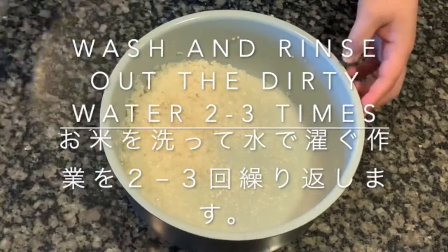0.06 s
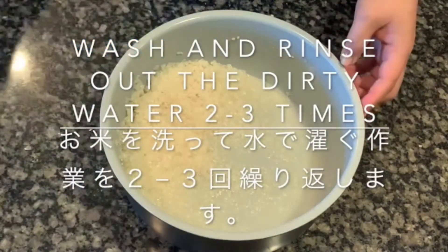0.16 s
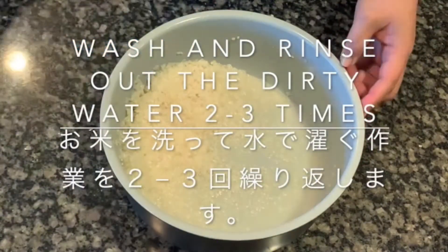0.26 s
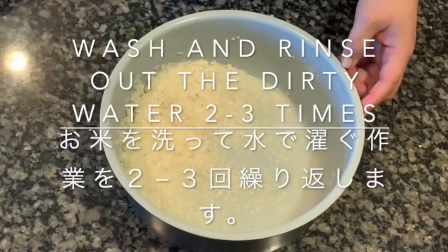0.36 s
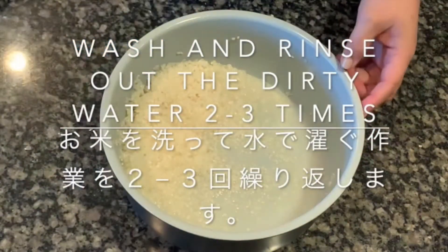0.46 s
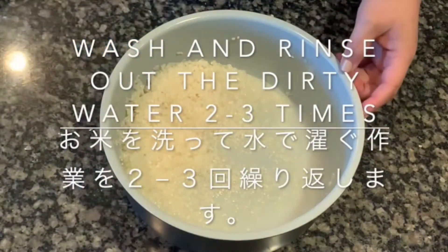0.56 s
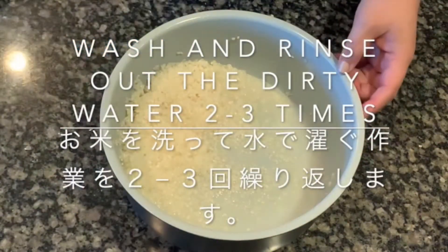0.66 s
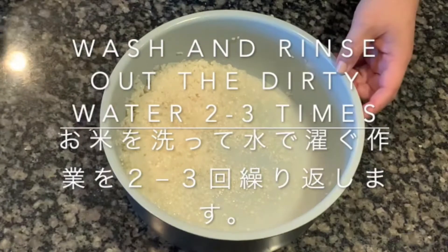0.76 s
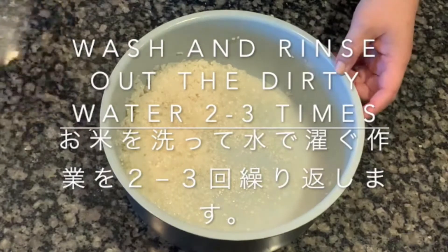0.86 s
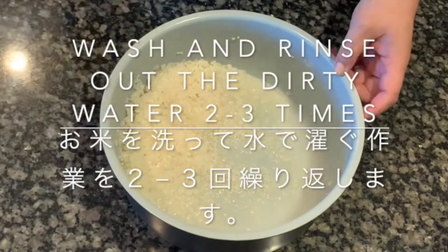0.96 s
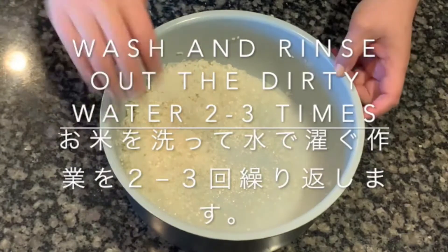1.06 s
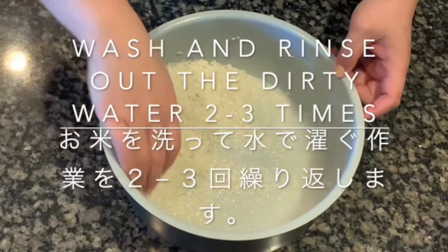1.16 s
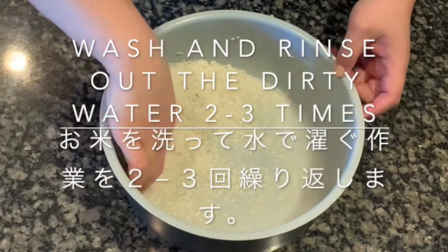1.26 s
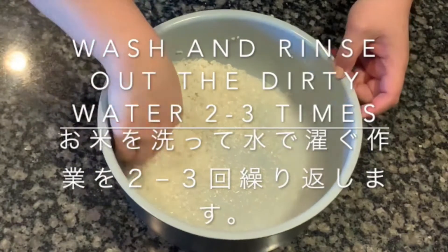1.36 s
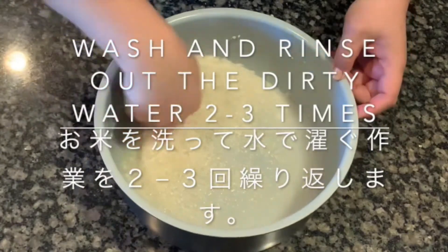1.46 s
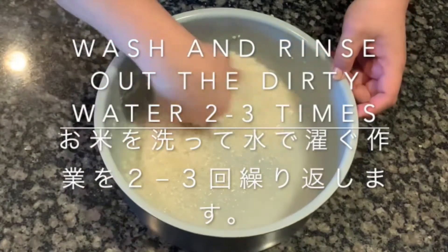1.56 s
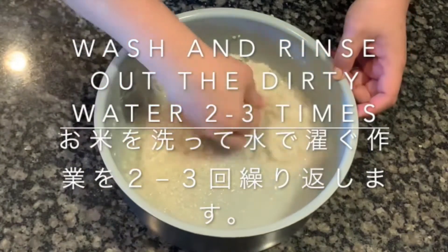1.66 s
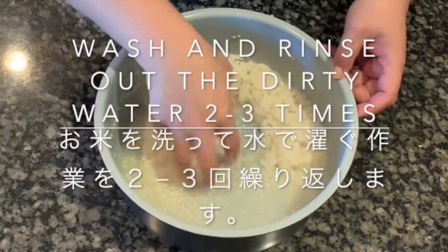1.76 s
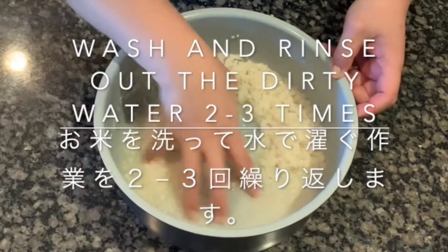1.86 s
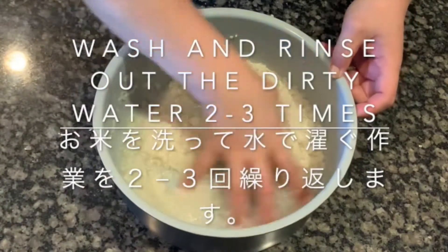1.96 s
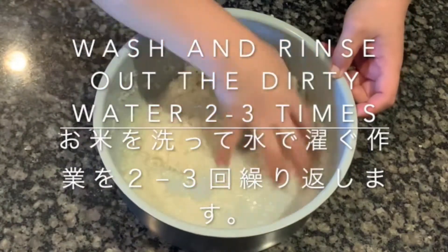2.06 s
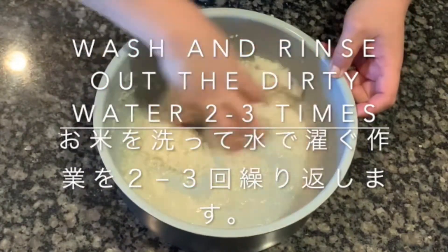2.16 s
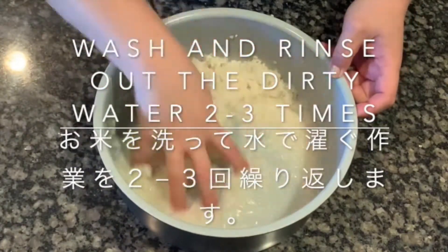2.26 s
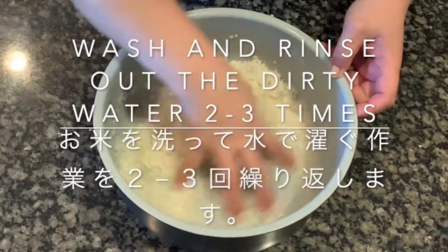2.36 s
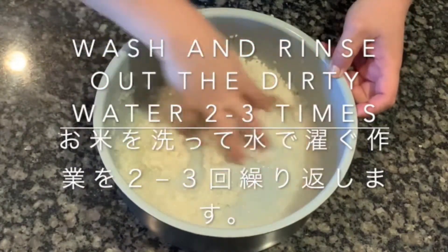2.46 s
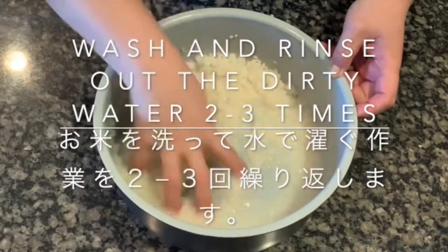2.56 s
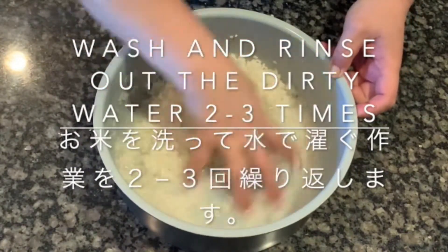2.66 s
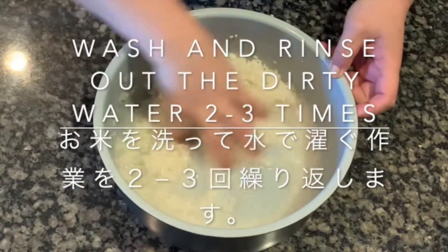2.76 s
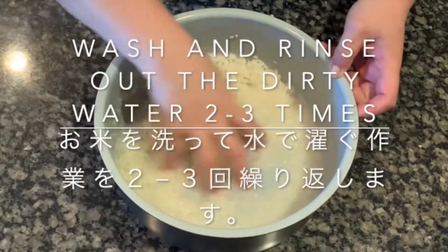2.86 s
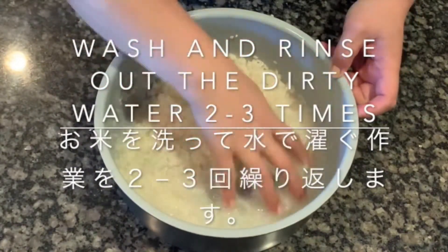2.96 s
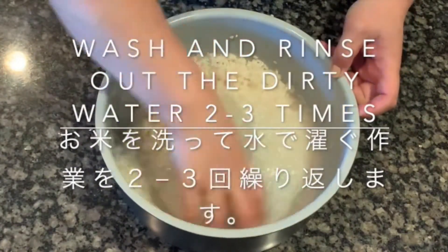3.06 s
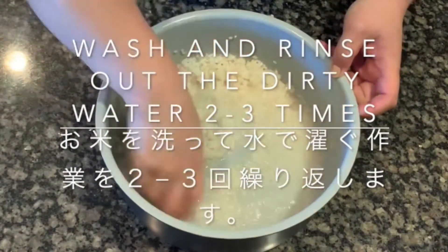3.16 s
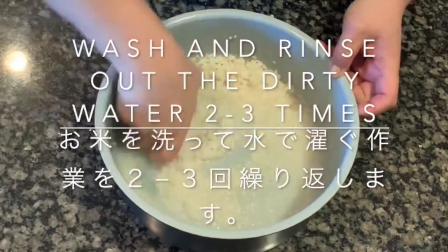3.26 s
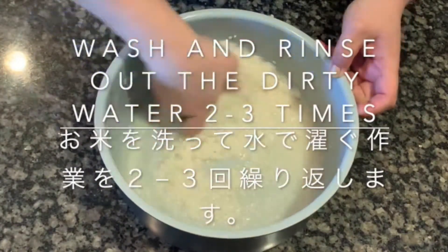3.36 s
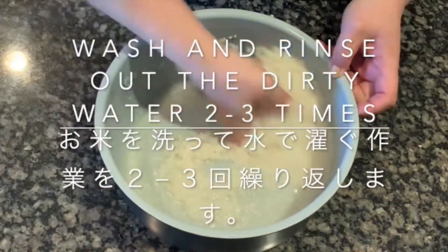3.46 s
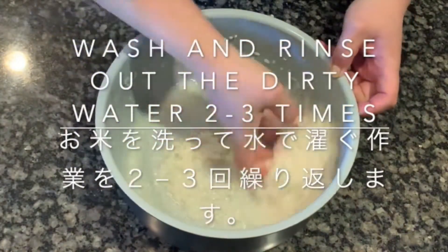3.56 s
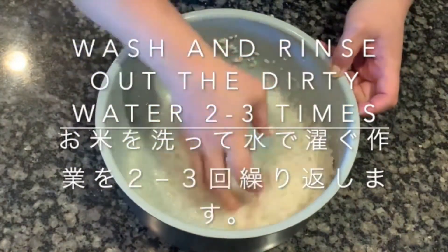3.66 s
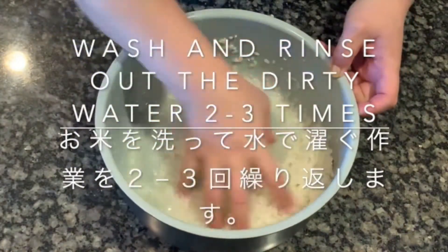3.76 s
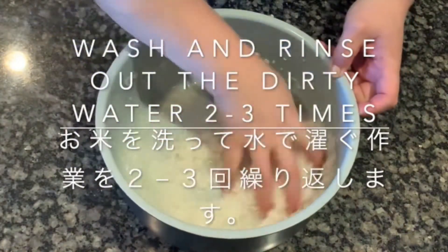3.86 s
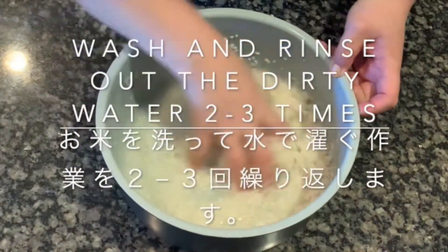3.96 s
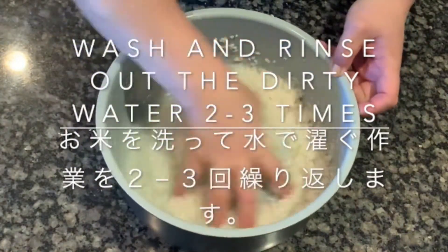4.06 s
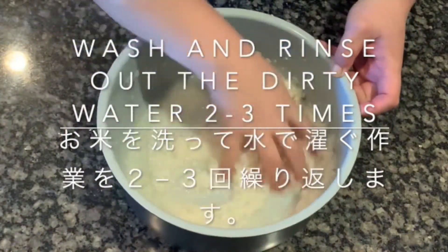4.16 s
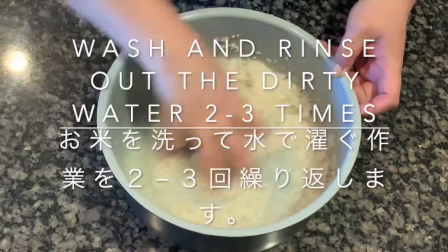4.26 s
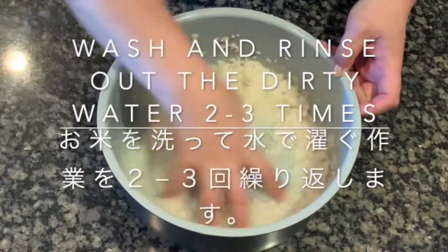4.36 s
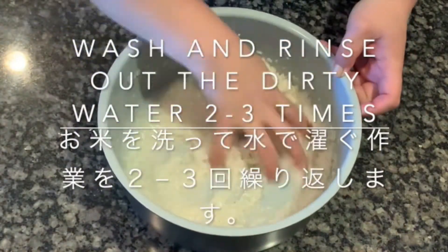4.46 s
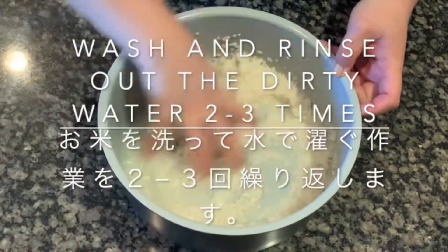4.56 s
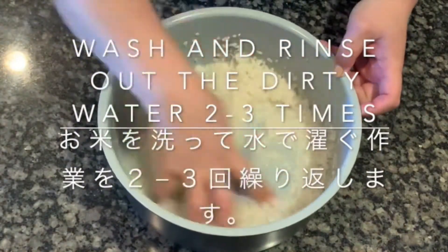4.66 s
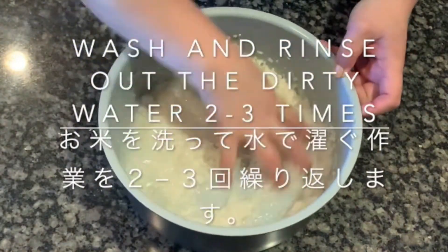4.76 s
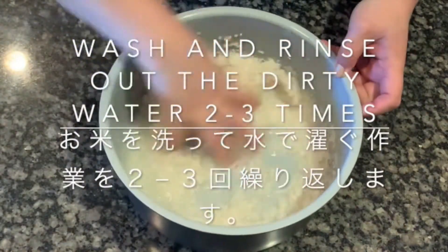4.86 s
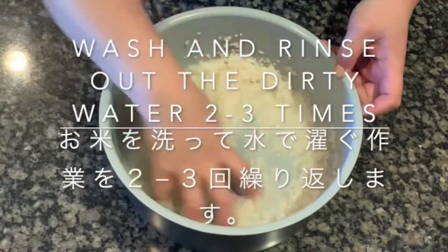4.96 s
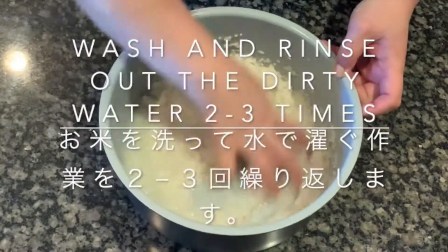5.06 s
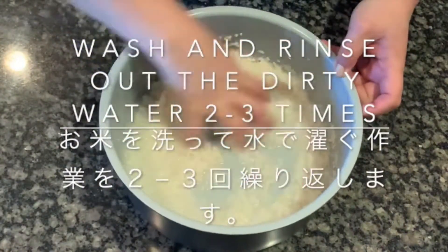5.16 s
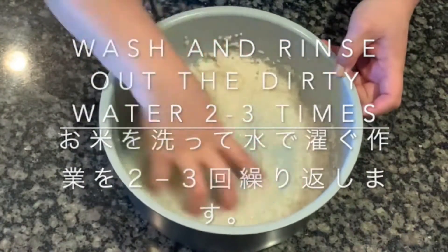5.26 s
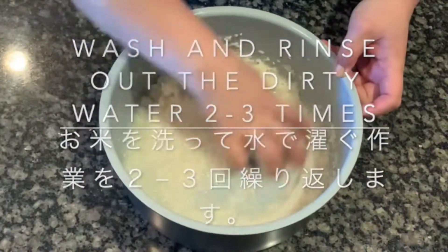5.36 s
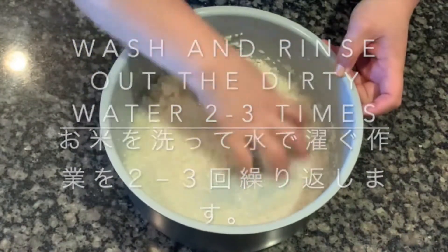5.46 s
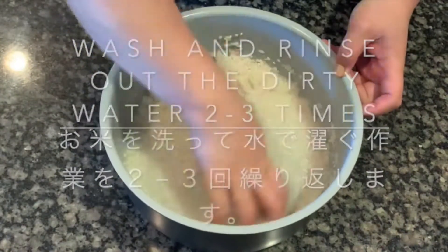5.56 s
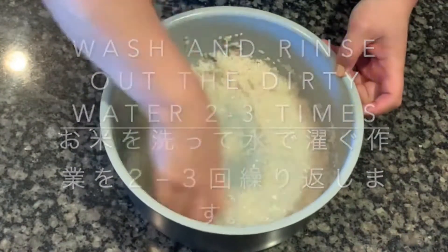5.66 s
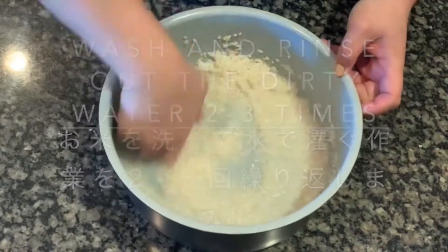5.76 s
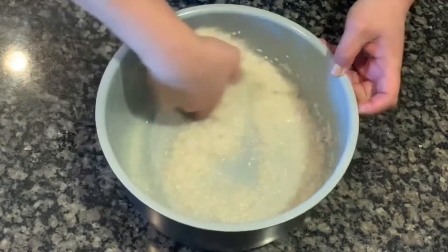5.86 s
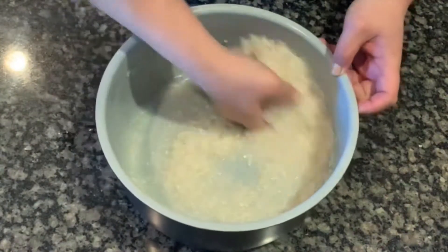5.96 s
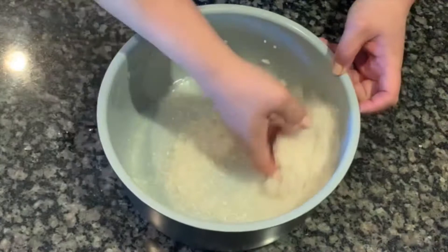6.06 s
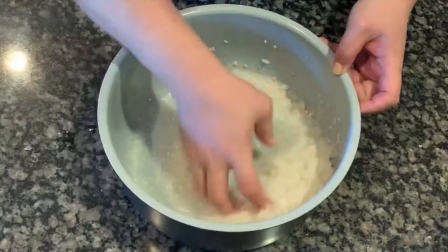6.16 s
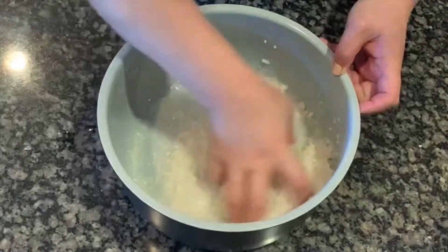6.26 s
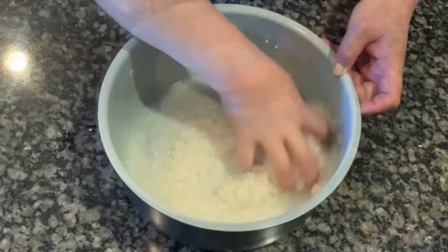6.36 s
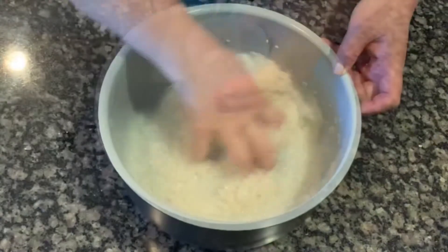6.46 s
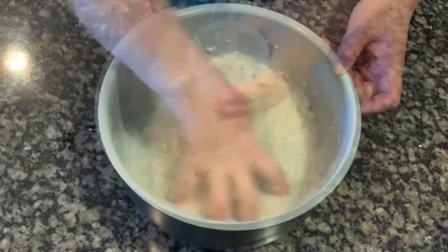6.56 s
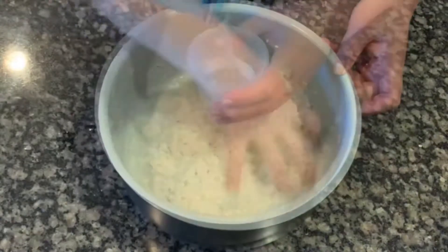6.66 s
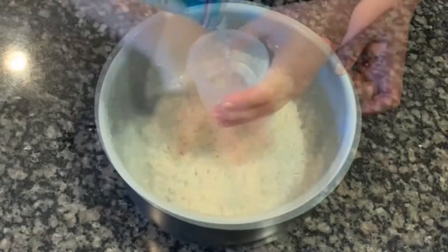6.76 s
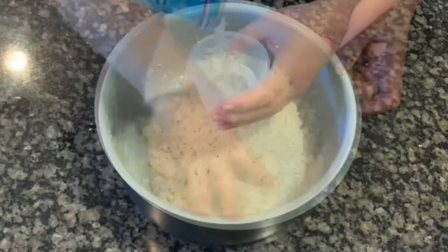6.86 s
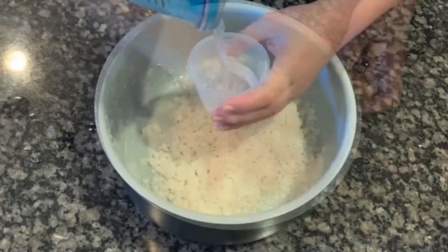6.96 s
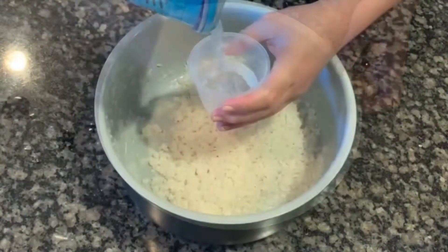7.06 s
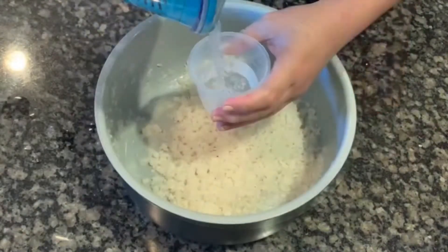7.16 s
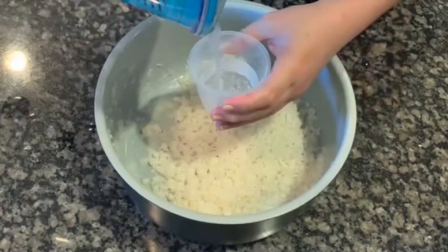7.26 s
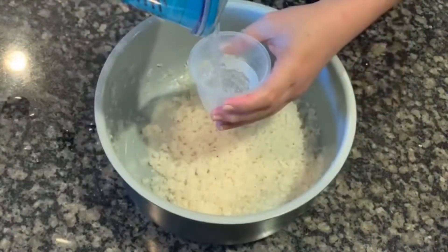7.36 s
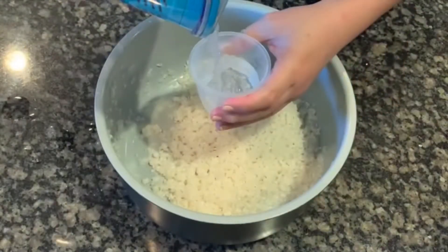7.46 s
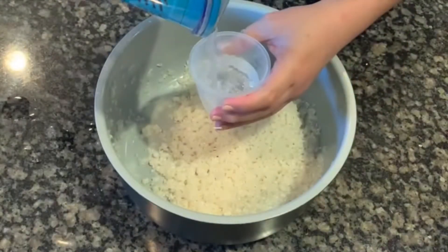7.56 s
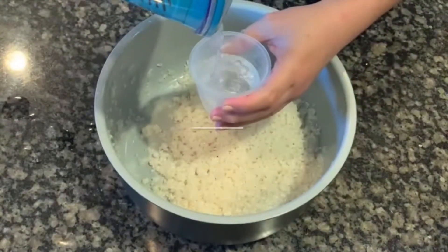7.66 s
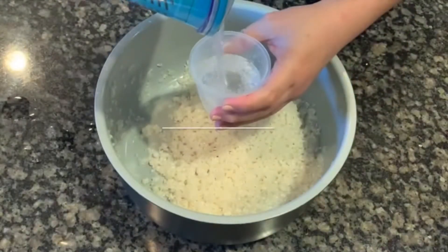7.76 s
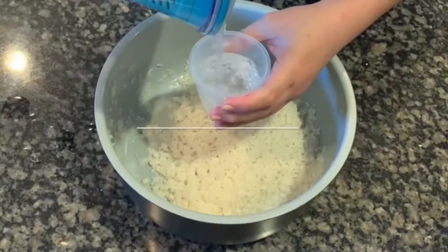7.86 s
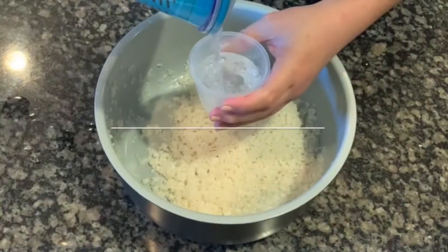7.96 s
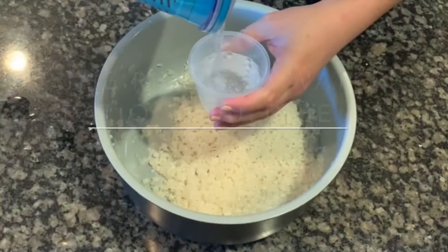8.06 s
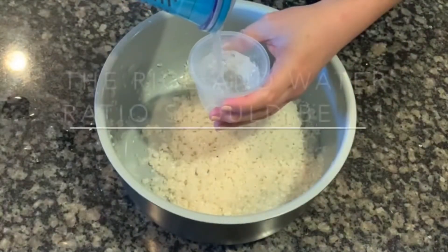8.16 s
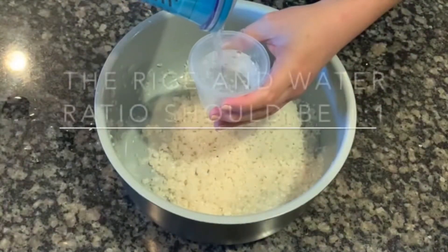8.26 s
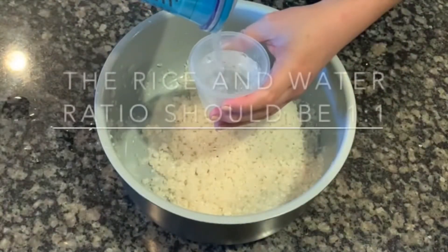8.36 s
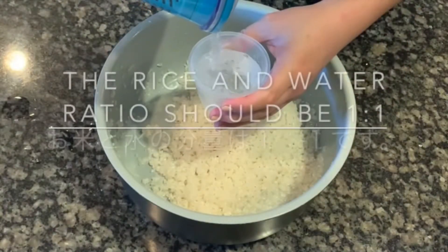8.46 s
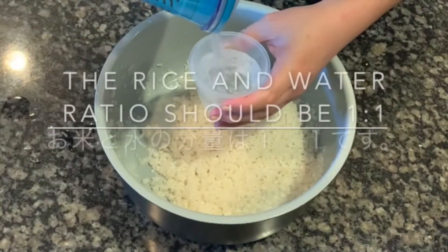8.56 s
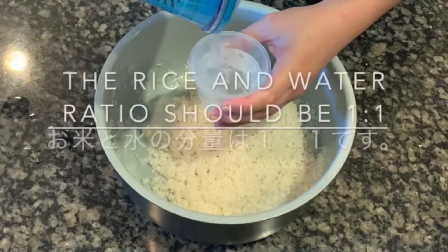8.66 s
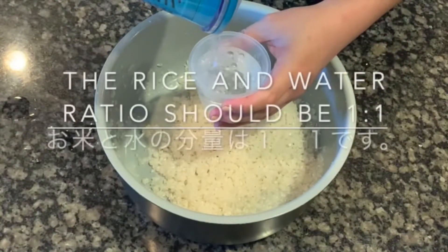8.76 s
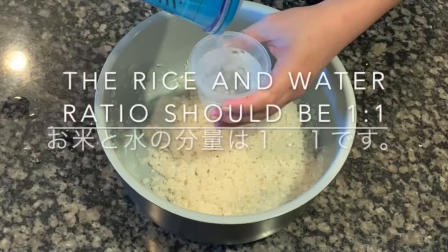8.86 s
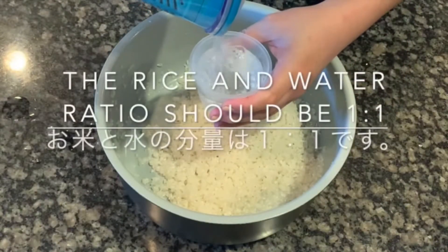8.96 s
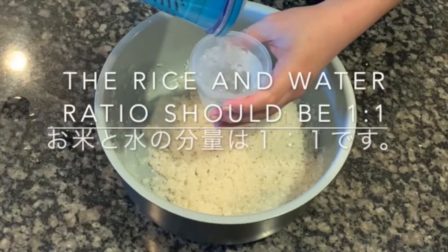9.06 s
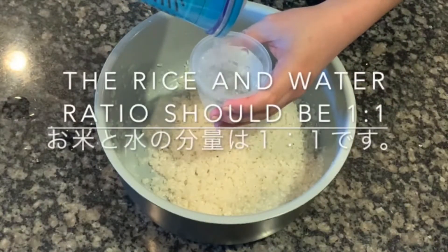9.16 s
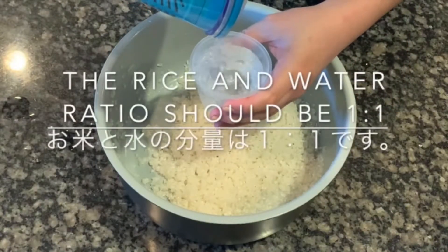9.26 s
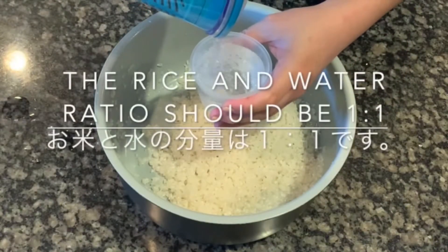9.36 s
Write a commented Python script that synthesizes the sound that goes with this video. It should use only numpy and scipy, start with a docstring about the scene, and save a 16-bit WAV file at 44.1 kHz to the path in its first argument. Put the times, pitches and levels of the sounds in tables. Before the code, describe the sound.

A small kitchen heard from close by, with faint low rumble and a soft appliance hum throughout. At about 0.25 s a heavy metal pot of wet rice meets a stone counter with a deep, dull thud and clack, repeated at 0.42 s, followed by tiny rattles and a short slide of grains. A slight nudge comes near 1 s. From 1.1 s a hand begins rubbing the rice softly; from 1.8 to 6.7 s it stirs in irregular strokes, several per second, hissing and crunching, strongest around 4.8 s, with squelching bubbles, short gulps and hollow sloshing in the pot. At 6.7 s stirring gives way to a thin stream poured into a plastic cup: rapid round plops, bubbles rising in pitch until about 8 s, sharp spray ticks and light hiss. It thins slightly and continues to the end at around 9.4 s.

```python
"""A double thud is heard first, as a metal pot of wet rice is set down on a stone counter; an appliance hums.
A hand then stirs the rice: grain impacts hiss and crackle, bubbles squelch and the air in the pot resonates.
Last, a thin stream trickles from a jug into a plastic cup held over the pot: bubbles ring and spray ticks.
Solids sound as damped modes and filtered impacts, water as decaying sines that may glide upward,
and diffuse reflections of a small kitchen surround them."""
import sys
import numpy as np
from scipy import signal
from scipy.fft import rfft, irfft, next_fast_len
from scipy.io import wavfile

SR = 44100
rng = np.random.default_rng(int(sys.argv[2]) if len(sys.argv) > 2 else 0)


def transcribe(u):
    """Save the signal u as a 16-bit wav file named by the first command-line argument.

    u: samples, shape (n,) or (channels, n), limited to [-1, 1]; the rate is SR.
    q: integer samples, one column per channel.
    """
    v = np.clip(np.atleast_2d(u).T, -1, 1)
    q = np.round(v * 32767).astype(np.int16)
    wavfile.write(sys.argv[1], SR, q)


N = 414540
TIME = np.arange(N) / SR
# the stream starts, then slowly thins
POUR_START_S, POUR_ATTACK_S, POUR_SAG_DB_PER_S = 6.68, 0.066, 0.24


def from_db(db):
    """Level to amplitude: 20 dB is a factor of ten."""
    return 10 ** (np.asarray(db) / 20)


def rms_one(x):
    """Normalise the mean power to 1."""
    return x / np.sqrt(np.mean(x ** 2) + 1e-20)


def gain_curve(rows):
    """Amplitude envelope interpolated in decibels, fading over 10 ms outside the rows."""
    start_s, level_db = np.transpose(rows)
    gate = np.clip(np.minimum(TIME - start_s[0], start_s[-1] - TIME) * 100 + 1, 0, 1)
    return gate * from_db(np.interp(TIME, start_s, level_db))


def at_hz(points, hz):
    """Read a spectrum on a logarithmic frequency axis, as pitch is heard."""
    table_hz, value = np.transpose(points)
    return np.interp(np.log(hz + 1), np.log(table_hz), value)


def butterworth(x, order, hz, kind="low"):
    """Maximally flat filter: passes its band without ripple."""
    return signal.sosfilt(signal.butter(order, hz, kind, fs=SR, output="sos"), x)


def colour(x, points):
    """Minimum-phase filter, built by folding the cepstrum; the table sets its shape, its power gain is 1."""
    size = 2 * next_fast_len(N // 2 + 4096)
    magnitude = rms_one(from_db(at_hz(points, np.fft.rfftfreq(size, 1 / SR))))
    cepstrum = irfft(np.log(magnitude))
    cepstrum[1:size // 2] *= 2
    cepstrum[size // 2 + 1:] = 0
    return irfft(rfft(x, size) * np.exp(rfft(cepstrum)))[..., :N]


def drift(rate):
    """Band-limited wandering: random knots, 2 * rate a second, joined by lines; rms 1."""
    knots = rng.standard_normal(8192)
    return rms_one(np.interp(TIME * 2 * rate, np.arange(len(knots)), knots))


def ring(x, hz, t60):
    """Damped resonator: a unit click starts a sine of height 1 that decays by 60 dB in t60 seconds."""
    radius, angle = from_db(-60 / (t60 * SR)), 2 * np.pi * hz / SR
    feedback = [1, -2 * radius * np.cos(angle), radius * radius]
    return signal.lfilter([0, np.sin(angle)], feedback, x + 1e-18)


def add(track, s, sound):
    """Superposition: mix a sound in at time s."""
    start = max(int(s * SR), 0)
    track[start:start + len(sound)] += sound[:max(N - start, 0)]


def band_noise(low_hz, high_hz, count):
    """Random pressure limited to a frequency band; rms 1."""
    return rms_one(butterworth(rng.standard_normal(count), 2, [low_hz, high_hz], "band"))


def clicks(per_s, spread_db):
    """Poisson impacts of random sign; a positive spread gives many small and a few large; rms 1."""
    size_db = spread_db * np.minimum(rng.exponential(1, N), 4)
    impacts = from_db(size_db) * rng.choice([-1, 1], N)
    return rms_one(impacts * (rng.random(N) < per_s / SR))


def bubble(hz, t60, rise):
    """Damped oscillation that starts at hz; a positive rise makes its pitch climb as of a surfacing bubble."""
    age = TIME[:int(1.5 * t60 * SR)] / t60
    tone = np.sin(2 * np.pi * hz * t60 * age * (1 + rise * age / 2))
    return tone * from_db(-60 * age) * (1 - np.exp(-age / .03))


def grains(per_s, centre_hz, octaves, cycles, spread_db, rise):
    """Poisson swarm of damped oscillations, each decaying 60 dB in the given cycles; rms 1."""
    out, centre = np.zeros(N), centre_hz * np.ones(N)
    chance, size = rng.random(N), np.minimum(rng.exponential(1, N), 3.5)
    offset = octaves * rng.uniform(-1, 1, N) * rng.random(N) ** .25
    pitch = np.minimum(centre * 2 ** offset, SR / 3)
    for i in np.flatnonzero(chance < per_s / SR):
        level = (-1) ** (i % 2) * from_db(spread_db * size[i]) * np.sqrt(pitch[i] / centre[i])
        add(out, i / SR, level * bubble(pitch[i], cycles / pitch[i], rise))
    return rms_one(out)


def swell(s, length):
    """Two-sided Gaussian envelope: a smooth rise to 1 at time s and a somewhat faster fall."""
    out, attack_share = np.zeros(N), 0.57
    age = np.arange(-2, 2, 1 / (length * SR))
    side = np.where(age < 0, attack_share, 1 - attack_share)
    add(out, s - 2 * length, np.exp(-np.minimum((age / side) ** 2, 20)))
    return out


def background(air_db=-58, hum_db=-61.5, hum_hz=120, apart_db=-13):
    """Stationary noise and tone: low room rumble and an appliance hum wavering in level and phase."""
    # slow course of the background: start_s, level_db
    course = [(0, 0), (5.2, -0.5), (6.7, -2.5), (8.7, -2.5), (9.4, -0.5)]
    # spectrum of the room rumble: freq_hz, level_db (relative)
    rumble = [(20, -12), (40, -7.5), (65, -2.5), (120, -4), (200, -10), (400, -13), (600, -23),
              (1200, -25.5), (2500, -39.5), (6000, -46), (16000, -45.5)]
    level = from_db(np.interp(TIME, *np.transpose(course)))
    hum_phase = 2 * np.pi * hum_hz * TIME + 0.12 * drift(9.9)
    hum = from_db(hum_db + 2 * drift(3.0)) * np.sqrt(2) * np.sin(hum_phase)
    air = level * from_db(air_db) * colour(rng.standard_normal((3, N)), rumble)
    # one air signal is common to both sides, two are separate
    return level * hum + air[0], from_db(apart_db) * air[1:]


def wall(x):
    """Modal synthesis: the steel wall of the pot, damped by wet rice, rings in all its modes."""
    # wall modes: freq_hz, level_db, t60_s
    modes = [(267, -3, .16), (373, -9, .2), (441, -8, .22), (490, -1, .22), (572, -5, .24), (684, 2, .19),
             (807, -2, .14), (897, -8, .2), (1055, -5, .22), (1125, -9, .2), (1419, -6, .22),
             (1491, -10, .22)]
    return sum(from_db(db) * ring(x, hz, t60) for hz, db, t60 in modes)


def pot_set_down(tick_s=0.0018, rattle_s=0.073, rattle_db=-17, wall_db=-37, slide_db=-51, slide_s=.432,
                 slide_t60=0.56, jolt_db=-23, jolt_s=0.03, slump_db=-33, slump_s=.05):
    """Impact excitation: soft weight drives low modes, the hard edge the wall; rice jolts, slumps and slides."""
    # the pot meets the counter: start_s, weight_db, contact_ms, edge_db (relative), edge_cutoff_hz
    knocks = [(0.2535, -9.5, 7.5, -25.5, 15000), (.295, -17, 16, -35.5, 11000), (0.423, -10, 19, -32, 3950),
              (0.4549, -21.5, 4.4, -58, 3970), (0.595, -39.5, 5.5, -44.5, 2640)]
    # pot and counter booming together: freq_hz, level_db (relative), t60_s
    boom = [(88.1, -17.5, 0.47), (122.4, 0, 0.25), (168.5, 6, 0.15), (200, -4, 0.11), (264, -13.5, 0.12)]
    # spectrum of the edge's clack: freq_hz, level_db (relative)
    clack_spectrum = [(150, -8), (500, 14.5), (1200, 2.5), (2200, -2), (4000, -12), (6500, -11),
                      (9000, -17), (16000, -20)]
    weight, clack = np.zeros((2, N))
    t = TIME[:SR // 2]
    for s, db, contact_ms, edge_db, edge_hz in knocks:
        landing = (1 - np.exp(-t * 1000 / contact_ms)) ** 2
        for hz, mode_db, t60 in boom:
            decay = from_db(db + mode_db - 60 * t / t60)
            add(weight, s, decay * landing * np.sin(2 * np.pi * hz * t))
        add(weight, s, from_db(db + jolt_db) * band_noise(140, 270, len(t)) * np.exp(-t / jolt_s))
        add(weight, s, from_db(db + slump_db) * band_noise(370, 570, len(t)) * np.exp(-t / slump_s))
        envelope = np.exp(-t / tick_s) + from_db(rattle_db) * np.exp(-t / rattle_s)
        clatter = rng.standard_normal(len(t)) * envelope
        add(clack, s, from_db(edge_db + 2.5) * butterworth(clatter, 2, edge_hz))
    slide_decay = (TIME > slide_s) * from_db(-60 * abs(TIME - slide_s) / slide_t60)
    sliding = grains(1500, 2380, octaves=1.03, cycles=16, spread_db=3.0, rise=0)
    slide = slide_decay * (sliding + 0.6 * clicks(970, spread_db=3.0))
    return weight + colour(clack, clack_spectrum) + from_db(wall_db) * wall(clack) + from_db(slide_db) * slide


def handling(soft_hz=800, bump_s=.011):
    """Short damped modes for the settling pot's rattles, low noise bursts for the hand's nudges."""
    # the pot chatters on the stone as it settles: start_s, level_db, freq_hz, t60_s
    chatter = [(0.4348, -33.5, 3710, 0.011), (0.4364, -44, 6840, .008), (.4485, -43, 6700, .008),
               (0.4976, -39.5, 3800, 0.011), (0.5604, -35, 4470, 0.0023)]
    # the hand shifts its hold and nudges the pot: start_s, level_db (before the low-pass)
    bumps = [(0.991, -44), (1.004, -45), (1.019, -57)]
    rattles, nudges = np.zeros((2, N))
    t = TIME[:SR // 10]
    for s, db, hz, t60 in chatter:
        add(rattles, s, from_db(db) * ring(t == 0, hz, t60))
    for s, db in bumps:
        add(nudges, s, from_db(db) * band_noise(110, 350, len(t)) * np.exp(-t / bump_s))
    return rattles + butterworth(nudges + 1e-18, 2, soft_hz)


def touch():
    """Contact gain: 1, except in spells when the hand's contact sounds stronger or eases off."""
    # changes of contact, faded at both ends: start_s, end_s, level_db
    spells = [(.95, 1.073, 8), (1.63, 1.694, -14), (1.852, 1.882, -7.5), (2.79, 2.832, -4),
              (3.505, 3.597, -3), (4.847, 4.88, -2), (5.271, 5.308, -7)]
    fade_s, db = 0.0094, 0
    for start, end, depth in spells:
        db = db + depth * np.clip(np.minimum(TIME - start, end - TIME) / fade_s + 1, 0, 1)
    return from_db(db)


def pushes():
    """Power addition of the hand's strokes: gains of rubbing, slosh and squelch, and bubble pitch."""
    # steady movement of the grains under the hand: start_s, level_db
    stirring = [(1.58, -62), (1.77, -48), (2.04, -42), (2.47, -46), (2.78, -44.5), (3.3, -65), (3.43, -47),
                (3.67, -51), (3.85, -41.5), (4.01, -41), (4.84, -37.5), (5.42, -40.5), (5.71, -39.5),
                (5.95, -44.5), (6.35, -41), (6.56, -41.5), (6.69, -50), (6.9, -52.5)]
    # water rocking round the pot: start_s, level_db
    rocking = [(1.1, -68), (1.64, -61), (1.8, -57), (2.1, -51.5), (2.56, -52.5), (2.83, -64), (3.16, -62),
               (3.46, -65), (3.66, -88), (3.83, -55), (5.27, -50), (5.42, -59.5), (5.97, -59.5),
               (6.39, -54.5), (6.8, -78)]
    # fingers push through the rice: peak_s, length_s, rub_db, slosh_db, squelch_db, bubble_hz (at the peak)
    strokes = [(1.123, 0.054, -54, -70, -78, 1900), (1.185, 0.07, -45, -69, -76, 1900),
               (1.278, 0.14, -47.5, -58.5, -56, 2380), (1.427, 0.16, -45, -58, -59.5, 2170),
               (1.546, 0.11, -45.5, -76, -65, 2270), (1.83, 0.023, -38, -56, -57, 1410),
               (1.939, 0.15, -37, -58, -55, 2620), (2.06, 0.081, -40, -47, -51.5, 1490),
               (2.376, 0.26, -36.5, -73, -61, 2400), (2.597, 0.18, -41.5, -54, -52, 2030),
               (2.686, 0.15, -47, -52.5, -68, 2300), (2.88, 0.039, -43.5, -64, -82, 2300),
               (2.959, 0.081, -44, -58, -55.5, 1960), (3.075, 0.11, -37.5, -55, -52, 1430),
               (3.158, 0.13, -42.5, -52, -54, 1260), (3.304, 0.18, -39.5, -79, -52.5, 1580),
               (3.42, 0.11, -43.5, -80, -76, 2200), (3.667, 0.067, -40, -54.5, -70, 1760),
               (3.874, 0.53, -46.5, -54.5, -57.5, 2390), (4.127, 0.076, -36, -70, -57, 1920),
               (4.18, 0.11, -51, -50, -72, 2000), (4.331, 0.12, -39, -51, -51, 2160),
               (4.466, 0.1, -35.5, -52, -83, 2200), (4.66, 0.14, -38.5, -67, -47.5, 2560),
               (4.763, 0.078, -30, -48, -53, 1860), (4.959, 0.092, -35, -52, -43, 1860),
               (5.077, 0.054, -33.5, -63, -49, 1600), (5.222, 0.12, -37, -49.5, -51, 1570),
               (5.373, 0.089, -51, -45.5, -46.5, 1710), (5.69, 0.3, -58, -59, -51.5, 1790),
               (5.829, 0.16, -38.5, -70, -50.5, 1730), (5.991, 0.064, -40, -53, -70, 1800),
               (6.11, 0.064, -39.5, -43.5, -52, 2040), (6.22, 0.17, -43, -68, -53, 1920),
               (6.344, 0.17, -41, -48, -55, 1490), (6.554, 0.17, -58, -53.5, -58.5, 1560),
               (6.672, 0.13, -43.5, -54, -60, 1690)]
    # the water gives way before the grains, and its bubbles shrink as it is squeezed
    water_lead_s, squeeze_octaves_per_s = 0.0032, 2.8
    # between pushes the water seeps quietly: level against the stirring, and bubble pitch
    seep_db, seep_hz = -20, 2140
    stir = gain_curve(stirring)
    rub, deep = stir ** 2, gain_curve(rocking) ** 2
    wet = (from_db(seep_db) * stir) ** 2 + 1e-12
    octaves = wet * np.log2(seep_hz)
    for s, length, rub_db, slosh_db, squelch_db, hz in strokes:
        water_power = swell(s - water_lead_s, length) ** 2
        rub = rub + (from_db(rub_db) * swell(s, length)) ** 2
        deep = deep + from_db(slosh_db) ** 2 * water_power
        squeeze = from_db(squelch_db) ** 2 * water_power
        wet = wet + squeeze
        # the pitch is a mean in octaves, weighted by power
        octaves = octaves + squeeze * (np.log2(hz) + squeeze_octaves_per_s * (TIME - s + water_lead_s))
    return np.sqrt(rub), np.sqrt(deep), np.sqrt(wet), 2 ** (octaves / wet)


def rice(rub, per_s=4000, patchy_db=3.0, rub_db=0.52, snap_db=-3):
    """Granular contact noise: Poisson impacts in bands that wander separately, with sudden crunches."""
    # clumps of rice crunch against the wall: start_s, level_db (relative), length_s, lowest_hz
    clumps = [(1.0934, -27, 0.0024, 6900), (1.095, -32, 0.016, 7950), (1.3933, -36, 0.0027, 6900),
              (1.522, -32, 0.017, 9000), (1.679, -33, 0.0046, 6340), (1.8144, -30, 0.008, 7550),
              (1.88, -36, 0.0072, 7000), (2.077, -22.5, 0.04, 8550), (2.391, -10.5, 0.0053, 7750),
              (2.426, -28, 0.034, 8400), (2.575, -21, 0.0024, 6560), (2.843, -26.5, 0.0047, 7500),
              (3.399, -29, 0.0044, 8000), (3.419, -28, 0.016, 9000), (3.6233, -33, .006, 7000),
              (3.644, -40.5, 0.046, 2040), (3.876, -28, 0.01, 8000), (4.0209, -36, 0.0037, 8000),
              (4.088, -25, .005, 8000), (4.158, -24, 0.029, 8100), (4.433, -15.5, 0.0083, 11500),
              (4.791, -16.5, 0.023, 10300), (5.078, -29, 0.0042, 8000), (5.25, -42, 0.0036, 6500),
              (5.9215, -36, .004, 8000), (5.965, -37, 0.0066, 8000), (6.098, -38, 0.012, 2020),
              (6.4245, -27, 0.0041, 3300), (6.4445, -32, .003, 6000), (6.702, -25, 0.0037, 9000)]
    # spectrum of the grain contacts: freq_hz, level_db (relative)
    contact_spectrum = [(1000, -12.5), (2500, -27.5), (4200, -8), (6000, -4.5), (7200, 2), (8500, -2),
                        (10200, 2.5), (12000, 0), (14000, -6.5), (16000, -10)]
    contacts, crunches = from_db(snap_db) * clicks(500, spread_db=0.0), np.zeros(N)
    edges = np.geomspace(1200, 17000, 13)
    for band in zip(edges, edges[1:]):
        impacts = butterworth(clicks(per_s, spread_db=3.0), 2, band, "band")
        contacts += from_db(patchy_db * drift(22)) * impacts
    for s, db, length, low_hz in clumps:
        age = TIME[:SR // 5] / length
        burst = rng.standard_normal(len(age)) * 2 * age ** 1.35 * np.exp(-age ** 2)
        add(crunches, s, from_db(db) * butterworth(burst, 3, low_hz, "high"))
    return rub * from_db(rub_db) * rms_one(colour(contacts, contact_spectrum)) + crunches


def scrape(rub, scrape_db=-13):
    """Stick-slip friction: packed grains give coarse grit in four wandering registers, and rasp when squeezed."""
    # packed rice rasps under a hard squeeze: peak_s, level_db, length_s
    rasps = [(1.11, -63, .04), (1.901, -41.5, 0.024), (2.33, -48.5, 0.16), (2.397, -52, 0.0074),
             (2.887, -57, 0.035), (3.656, -49, 0.043), (3.806, -51, 0.057), (4.007, -54, .04),
             (4.755, -52, .03), (5.435, -46, 0.023), (6.121, -48, 0.029), (6.423, -58, 0.0074)]
    grit = 0
    for hz in (2000, 2900, 4200, 5600):
        register = grains(380, hz, octaves=.45, cycles=9, spread_db=3.5, rise=0)
        grit = grit + from_db(3 * drift(30)) * register * hz
    squeeze = sum(from_db(db) * swell(s, length) for s, db, length in rasps)
    rasp = grains(1200, 3950, octaves=0.73, cycles=8.8, spread_db=6.0, rise=0)
    return from_db(scrape_db) * rub * rms_one(grit) + squeeze * rasp


def hollow(x):
    """Cavity resonance: the air modes of the pot act as parallel band-pass filters of alternating sign."""
    # air modes in the hollow of the pot: freq_hz, width_hz, level_db
    air_modes = [(518, 68, -3.5), (693, 16, -22), (851, 150, -9.5), (1044, 110, -5), (1410, 39, 3),
                 (1880, 145, -8.5)]
    out = 0
    for k, (hz, width, db) in enumerate(air_modes):
        radius = np.exp(-np.pi * width / SR)
        feedforward = np.array([1, 0, -1]) * (1 - radius * radius) / 2
        feedback = [1, -2 * radius * np.cos(2 * np.pi * hz / SR), radius * radius]
        out = out + (-1) ** k * from_db(db) * signal.lfilter(feedforward, feedback, x)
    return out


def water(deep, thin, centre_hz, slosh_db=-3.5, squelch_db=2.5, wall_db=-9, sway=.035, open_db=-10):
    """Bubble acoustics: large bubbles excite the hollow and wall, small ones squeeze out between grains."""
    # air pockets gulp, under the hand and once under the stream: start_s, level_db, start_hz, t60_s
    pockets = [(1.796, -27, 1430, 0.027), (1.826, -38.5, 910, 0.034), (1.831, -37, 527, 0.02),
               (2.04, -29, 580, 0.016), (2.25, -50, 610, 0.05), (2.89, -42.5, 520, 0.033),
               (2.71, -33, 556, 0.087), (3.04, -42, 1410, 0.06), (3.134, -38.5, 1310, 0.11),
               (3.92, -31.5, 890, 0.016), (4.61, -39.5, 565, 0.058), (4.642, -30, 2550, 0.03),
               (4.884, -38, 980, 0.086), (4.938, -31, 1613, 0.033), (5.085, -36.5, 553, 0.069),
               (5.25, -33, 565, 0.095), (5.36, -34, 544, 0.065), (5.378, -34, 1010, 0.039),
               (6.109, -38, 1010, 0.088), (6.15, -39, 872, 0.067), (6.37, -43, 552, 0.07),
               (6.645, -43.5, 548, 0.14), (9.092, -40, 525, 0.14)]
    # spectrum of the squelch: freq_hz, level_db (relative)
    squelch_spectrum = [(700, 10.3), (1300, 4.9), (2000, 0.5), (3000, 7.3), (4500, 10.2), (8000, 12.3)]
    slosh = rms_one(hollow(grains(350, 745, octaves=0.86, cycles=20.0, spread_db=1.0, rise=0.027)))
    # reading at an uneven pace makes the pitch sway
    slosh = np.interp(np.cumsum(1 + sway * drift(4)), np.arange(N), slosh)
    lapping = grains(250, 720, octaves=1.0, cycles=16, spread_db=3, rise=.15)
    slosh = rms_one(slosh + from_db(wall_db) * rms_one(wall(slosh)) + from_db(open_db) * lapping)
    squelch = grains(450, centre_hz, octaves=0.62, cycles=18.3, spread_db=-2.5, rise=0.26)
    squelch += grains(450, 2953, octaves=1.268, cycles=42, spread_db=-3.5, rise=0.22)
    squelch = rms_one(colour(squelch, squelch_spectrum))
    gulps = np.zeros(N)
    for s, db, hz, t60 in pockets:
        add(gulps, s, from_db(db) * bubble(hz, t60, rise=0.11))
    return from_db(slosh_db) * deep * slosh + from_db(squelch_db) * thin * squelch + gulps


def stream_bubble_hz(s):
    """Smaller bubbles oscillate faster: their pitch climbs as the cup fills, then holds."""
    first_hz, octaves_per_s, fill_s = 1493, 0.31, 1.36
    return first_hz * 2 ** (octaves_per_s * np.clip(s - POUR_START_S, 0, fill_s))


def pouring(plop_db=0.5, cluster_db=-7.5, splat_db=-7, splat_s=0.0028, slap_db=-0.5, plop_t60=0.032,
            burble_db=-59.0, spray_db=-63, crack_db=7, tick_db=-0.5, tick_s=0.0024, ping_db=2, ping_cycles=16,
            pip_t60=0.018, splash_db=-5, splash_s=0.0021, hollow_db=-9, gurgle_db=-9, waver_db=3, spatter_db=3,
            tinkle_db=-72, tinkle_peak_db=-68, wash_db=-69):
    """Drop impact and bubble entrainment: each drop slaps and traps bubbles amid burble, spray and wash."""
    # drops plop into the cup: start_s, level_db (relative), start_hz
    drop_rows = [(6.7237, -39, 1720), (6.746, -40, 1410), (6.8133, -38.5, 1290), (6.854, -39, 1120),
                 (6.889, -32, 1100), (6.9173, -54, 1600), (6.9546, -39.5, 1155), (7.0123, -49, 1620),
                 (7.064, -35, 1104), (7.0665, -32.5, 1830), (7.0882, -35.5, 1460), (7.1544, -43, 1400),
                 (7.1848, -42.5, 1600), (7.207, -44, 1770), (7.2713, -37, 1090), (7.298, -33, 1080),
                 (7.341, -39, 1410), (7.3663, -36.5, 1110), (7.4387, -44, 1090), (7.5197, -41, 1410),
                 (7.535, -38.5, 2020), (7.559, -41, 1220), (7.6173, -40.5, 1120), (7.6625, -41, 1800),
                 (7.672, -44, 1680), (7.6921, -40.5, 2140), (7.722, -39, 980), (7.761, -42, 2040),
                 (7.8413, -36, 2140), (7.9277, -39, 2200), (7.9495, -32, 2050), (7.979, -40, 2100),
                 (8.0174, -32.5, 1810), (8.027, -42, 2070), (8.0824, -43, 2220), (8.1266, -42.5, 2090),
                 (8.159, -35.5, 1820), (8.1933, -41, 1105), (8.234, -42.5, 1940), (8.273, -44.5, 1110),
                 (8.303, -44, 1770), (8.3314, -40, 2190), (8.3814, -34.5, 2055), (8.4144, -53, 2230),
                 (8.484, -37.5, 2140), (8.5183, -38, 1990), (8.585, -44.5, 2210), (8.61, -45, 1780),
                 (8.632, -44, 2680), (8.7317, -46.5, 935), (8.7483, -43.5, 2160), (8.921, -37.5, 1070),
                 (8.962, -43.5, 1120), (8.9912, -48, 1120), (9.0555, -45.5, 1036), (9.091, -40, 1060),
                 (9.133, -39, 1000), (9.165, -53, 2250), (9.314, -49, 1090), (9.3593, -38, 1880)]
    # the sharpest ticks of spray on the plastic: start_s, level_db (relative), freq_hz
    tick_rows = [(6.919, -28, 10500), (6.951, -28.5, 10400), (7.011, -34.5, 11300), (7.04, -41, 14100),
                 (7.0624, -31.5, 9740), (7.108, -28.5, 15300), (7.1899, -39, 10500), (7.2089, -47, 10500),
                 (7.242, -34.5, 10400), (7.273, -34, 10300), (7.298, -36, 15300), (7.3117, -29.5, 12200),
                 (7.3411, -28.5, 9900), (7.561, -28, 10600), (7.5765, -27.5, 10600), (7.977, -41.5, 10400),
                 (8, -37, 11000), (8.018, -36, 12500), (8.0275, -51, 15000), (8.084, -40, 10300),
                 (8.128, -38, 11200), (8.137, -40, 12200), (8.1776, -37, 10600), (8.193, -31.5, 11100),
                 (8.3284, -52, 10200), (8.361, -38, 7500), (8.394, -31, 10900), (8.5182, -33.5, 15000),
                 (8.6106, -40, 10400), (8.72, -39, 12100), (8.7478, -36, 11100), (8.812, -39.5, 11100),
                 (8.981, -41, 12100), (9.0273, -38, 10700), (9.0926, -45, 10200), (9.246, -36.5, 10200),
                 (9.3583, -33.5, 14100)]
    # small bubbles burst and splash against the cup: start_s, level_db, start_hz
    pip_rows = [(7.341, -42.5, 4160), (7.5595, -37, 2800), (7.578, -48, 4200), (8.1586, -39, 2780),
                (8.2834, -54, 5100), (8.294, -42, 3870), (8.329, -43, 5940), (8.394, -39.5, 3220),
                (8.4143, -46, 6000), (9.057, -37, 6000)]
    # spectra of the burble, the spray and the stream's soft hiss: freq_hz, level_db (relative)
    burble_spectrum = [(500, -30), (700, -5), (1080, 11), (1230, -2.5), (1420, 3.5), (1600, 2.5),
                       (2050, 12.5), (2500, -1.5), (3500, -4.5), (6000, -17)]
    spray_spectrum = [(1500, 5), (4000, 4), (6500, 1.5), (8300, 17.5), (10500, 15), (13000, 11.5),
                      (16000, 13)]
    wash_spectrum = [(1500, -9), (3000, 6), (4500, -2), (6300, 8), (8000, -2), (11000, -4.5), (16000, 0)]
    # four more bubbles with each drop, a moment apart, each fainter by the loss
    cluster_s, cluster_octaves, cluster_t60_s, cluster_loss_db = .004, 0.54, 0.016, 10
    running_s = np.maximum(TIME - POUR_START_S, 0)
    onset = np.minimum(running_s / POUR_ATTACK_S, 1)
    flow = onset * from_db(-POUR_SAG_DB_PER_S * running_s)
    burble = flow * from_db(burble_db + waver_db * drift(18))
    spray = flow * from_db(spray_db + spatter_db * drift(8.4))
    plops, splats, ticks, pings = np.zeros((4, N))
    t = TIME[:SR // 10]
    for s, db, hz in drop_rows:
        add(plops, s, from_db(db + plop_db) * bubble(hz, plop_t60, rise=0.11))
        for k, (late, pitch) in enumerate(rng.random(size=(4, 2))):
            extra_hz = stream_bubble_hz(s) * 2 ** (cluster_octaves * (2 * pitch - 1))
            extra = bubble(extra_hz, cluster_t60_s, rise=0.04)
            level = from_db(db + cluster_db - cluster_loss_db * k)
            add(plops, s + cluster_s * (k + late / 2), level * extra)
        splat = from_db(splat_db) * rng.standard_normal(len(t)) * np.exp(-t / splat_s)
        add(splats, s, from_db(db) * (from_db(slap_db) * (t == 0) + splat))
    # spray strikes the plastic with a crack, a very short ping and a puff of mist
    for s, db, hz in tick_rows:
        add(pings, s, from_db(db + ping_db) * bubble(hz, ping_cycles / hz, rise=0))
        puff = from_db(db + tick_db) * rng.standard_normal(len(t)) * np.exp(-t / tick_s) / 2
        add(ticks, s, from_db(db + crack_db) * (t == 0) + puff)
    for s, db, hz in pip_rows:
        add(pings, s, from_db(db) * bubble(hz, pip_t60, rise=0.04))
        splash = band_noise(hz / np.sqrt(2), hz * np.sqrt(2), len(t))
        add(pings, s, from_db(db + splash_db) * splash * np.exp(-t / splash_s))
    fine = grains(550, stream_bubble_hz(TIME), octaves=0.98, cycles=18, spread_db=4.5, rise=0.13)
    fine = rms_one(colour(fine + clicks(500, spread_db=-15.0), burble_spectrum))
    drops = plops + colour(splats, burble_spectrum) + burble * fine
    # the patter keeps a low air resonance of the pot ringing
    gurgle = from_db(gurgle_db) * burble * rms_one(ring(clicks(90, spread_db=4.5), 559.0, 0.028))
    mist = clicks(110, spread_db=4.5) + 0.12 * clicks(2500, spread_db=4.0)
    # tiny bubbles tinkle under the stream, and in one short swell at 5.1 s, ahead of it
    fizz = from_db(tinkle_db) * flow + from_db(tinkle_peak_db) * swell(5.1, length=0.18)
    tinkle = fizz * grains(400, 4454, octaves=0.78, cycles=45, spread_db=2.5, rise=0.022)
    # the stream breaking up in the cup hisses at a flickering level
    hiss = colour(clicks(2500, spread_db=4.0), wash_spectrum)
    wash = onset * from_db(wash_db + 5.9 * drift(40)) * hiss
    spatter = colour(ticks + spray * rms_one(mist), spray_spectrum)
    return drops - from_db(hollow_db) * hollow(drops) + gurgle + tinkle + wash + pings + spatter


def gurgles(gurgle_db=-65):
    """Lightly damped bubbles: under the stream they ring on and overlap, gliding up as they rise."""
    running_s = np.maximum(TIME - POUR_START_S, 0)
    onset = np.minimum(running_s / POUR_ATTACK_S, 1)
    flow = onset * from_db(gurgle_db - POUR_SAG_DB_PER_S * running_s)
    return flow * grains(45, stream_bubble_hz(TIME), octaves=1.0, cycles=55, spread_db=2.5, rise=.25)


def kitchen(x, t60_s=0.34, onset_s=0.0008, lowest_hz=200):
    """Diffuse reverberation: exponentially decaying noise tails, uncorrelated at the two sides."""
    # spectrum of the reflections, thin in the bass: freq_hz, level_db (relative)
    reflections = [(90, -13), (180, 2), (300, 11), (600, 4), (1500, 0.5), (4000, 4), (8000, -7), (16000, 5)]
    t = TIME[:SR * 3 // 4]
    tail = rng.standard_normal((2, len(t))) * from_db(-60 * t / t60_s) * (1 - np.exp(-t / onset_s))
    tail /= np.sqrt(np.sum(tail ** 2, axis=1, keepdims=True))
    tail = butterworth(tail, 2, lowest_hz, "high")
    return signal.fftconvolve(colour(x, reflections)[None], tail, axes=1)[:, :N]


def ports(x, shift_per_s=3):
    """Interaural-style differences: direct sound differs in phase and level; bounces differ and slowly shift."""
    # phase by which the left leads: freq_hz, phase_rad
    lead = [(20, 0), (130, .2), (600, .1), (1700, .2), (3000, 1.0), (4500, .9), (5200, 1.2), (6500, -.3),
            (7500, -1.7), (8650, -3.14), (10200, -6), (11800, -6.6), (13300, -9.4), (15000, -12.3),
            (22050, -12.6)]
    # left level minus right level: freq_hz, difference_db
    balance = [(60, -0.5), (130, -3.5), (280, -0.5), (550, 1), (1200, .5), (2500, -1), (4800, -4.5),
               (7000, 0), (16000, 0)]
    # share of the power that arrives after bouncing round the pot wall: freq_hz, share (0 to 1)
    bounce_share = [(200, 0.06), (600, 0.39), (1500, 0.2), (2800, 0.91), (5000, 0.97), (7000, 0.23),
                    (8500, 0), (11000, 0.21), (16000, 0)]
    size = 2 * next_fast_len(N // 2 + 4096)
    hz = np.fft.rfftfreq(size, 1 / SR)
    sides = np.array([[1], [-1]])
    share = at_hz(bounce_share, hz)
    arriving = rfft(x, size) * from_db(at_hz(balance, hz) / 2 * sides)
    phase = np.exp(.5j * at_hz(lead, hz) * sides)
    direct = irfft(arriving * np.sqrt(1 - share) * phase)[:, :N]
    # three sets of bounces, decaying over 8 ms, are blended at constant power
    paths = rng.standard_normal((3, 2, SR // 10)) * np.exp(-TIME[:SR // 10] / .008)
    paths /= np.linalg.norm(paths, axis=2, keepdims=True)
    bounced = irfft(arriving * np.sqrt(share) * rfft(paths, size))[..., :N]
    blend = np.array([drift(shift_per_s) for _ in paths])
    blend /= np.linalg.norm(blend, axis=0)
    return direct + np.sum(bounced * blend[:, None], axis=0)


def scene():
    """Superposition of near sources, with a little diffuse kitchen sound around them."""
    hum, diffuse = background()
    thuds = pot_set_down() + handling()
    rub, slosh, squelch, bubble_hz = pushes()
    contact = touch()
    rubbing = rice(rub * contact) + scrape(rub * contact)
    sloshing = water(slosh, squelch * np.sqrt(contact), bubble_hz)
    pour = pouring() + gurgles()
    sent = from_db(-6.5) * thuds + from_db(-49.0) * rubbing + from_db(-5.5) * sloshing + from_db(-8.5) * pour
    return ports(thuds + rubbing + sloshing + pour + hum) + kitchen(sent) + diffuse


def record(dry):
    """Band limitation: a steep elliptic low-pass cuts the top."""
    cutoff_hz = 15900
    return signal.sosfilt(signal.ellip(12, .1, 80, cutoff_hz, fs=SR, output="sos"), dry)


dry = scene()
out = record(dry)
transcribe(out)
```